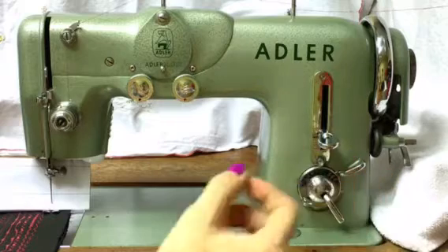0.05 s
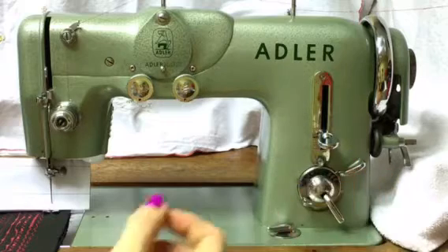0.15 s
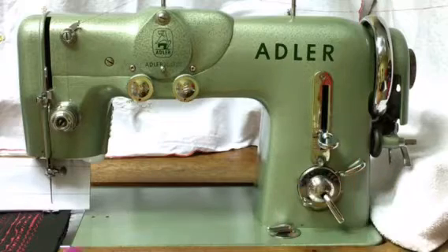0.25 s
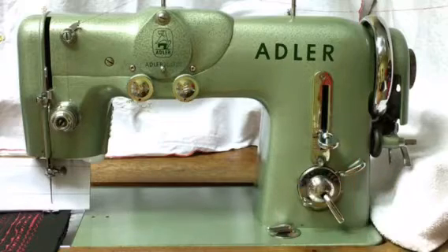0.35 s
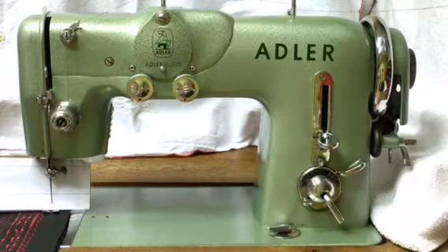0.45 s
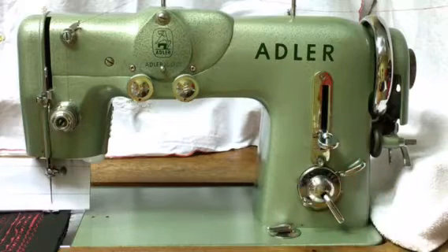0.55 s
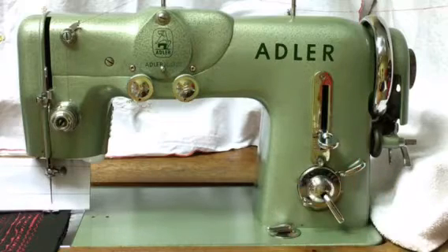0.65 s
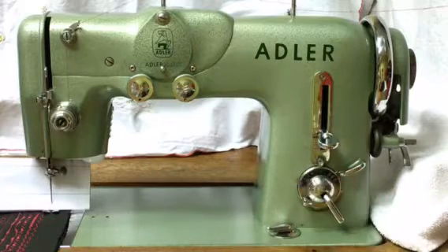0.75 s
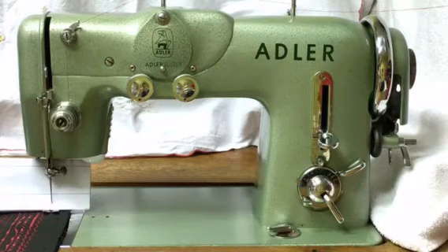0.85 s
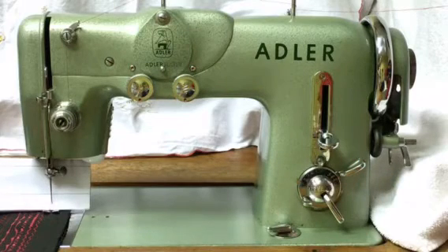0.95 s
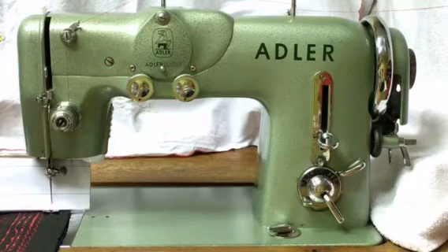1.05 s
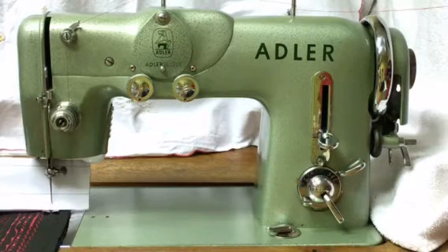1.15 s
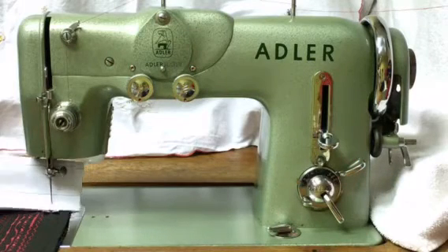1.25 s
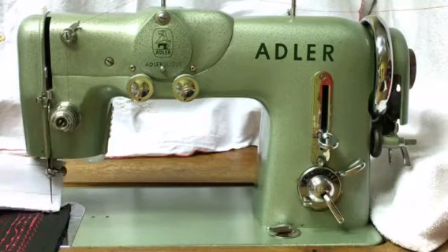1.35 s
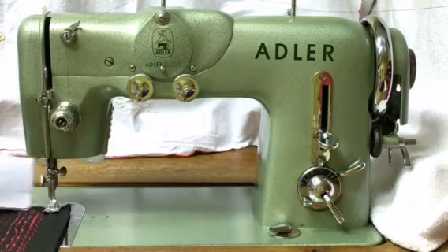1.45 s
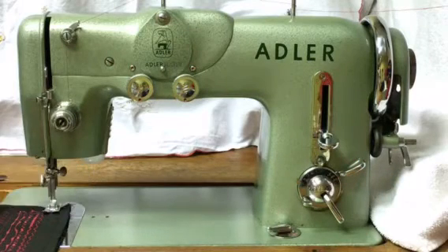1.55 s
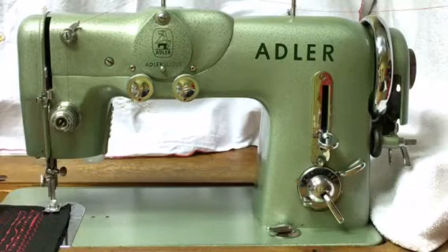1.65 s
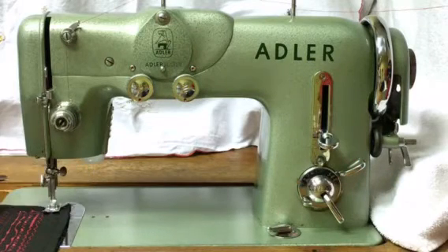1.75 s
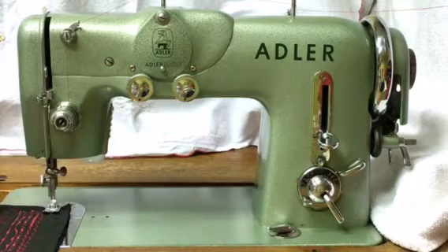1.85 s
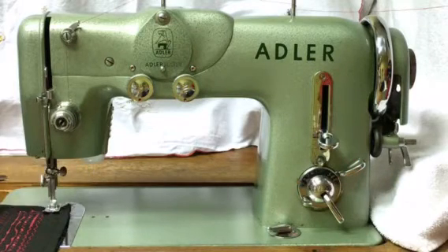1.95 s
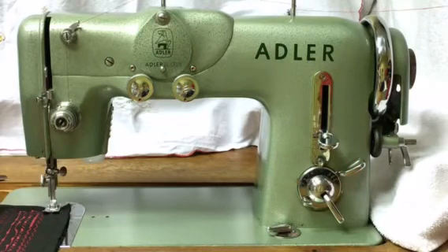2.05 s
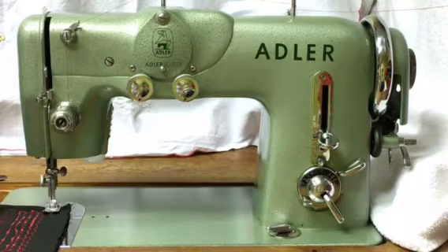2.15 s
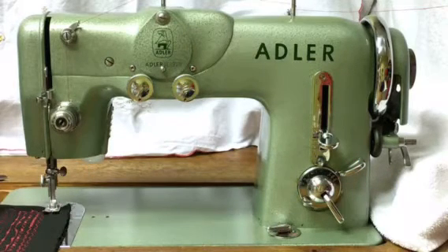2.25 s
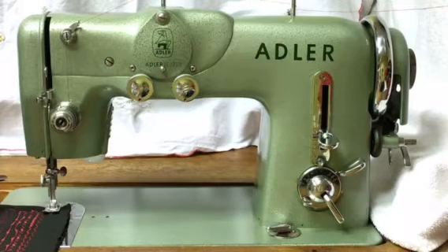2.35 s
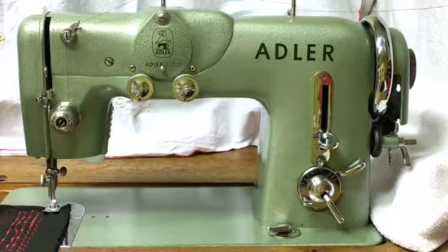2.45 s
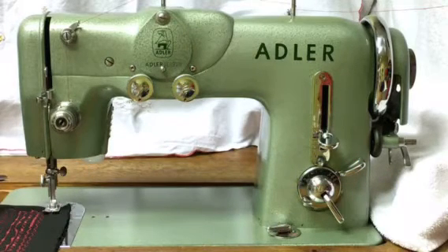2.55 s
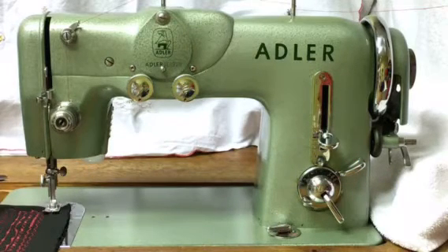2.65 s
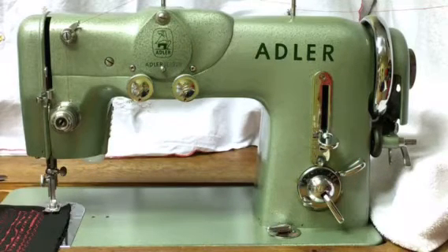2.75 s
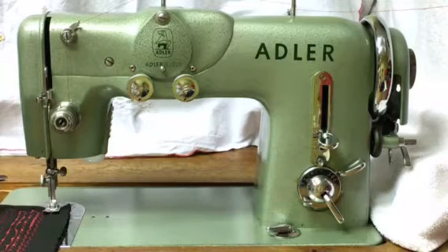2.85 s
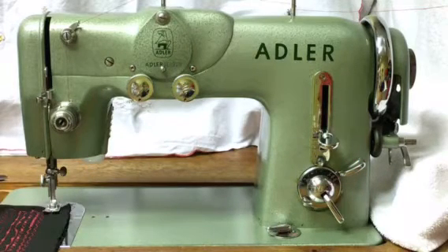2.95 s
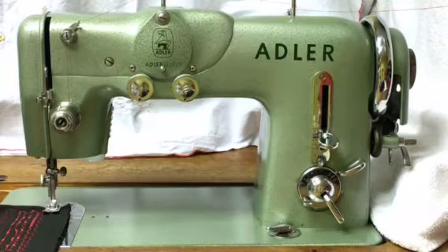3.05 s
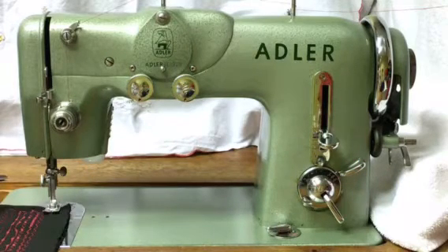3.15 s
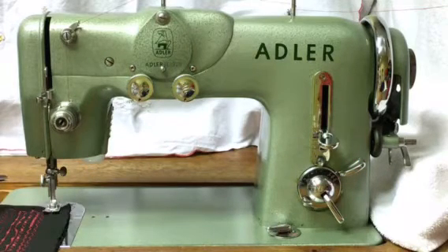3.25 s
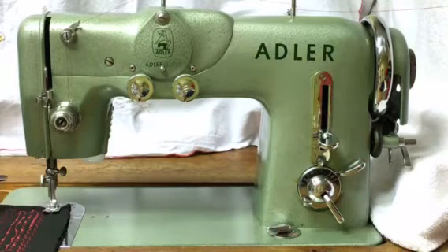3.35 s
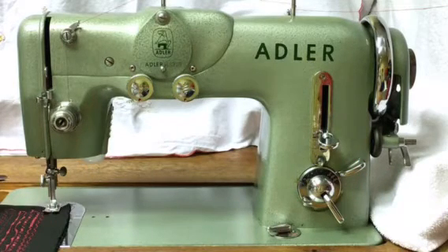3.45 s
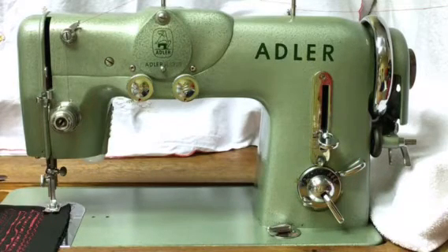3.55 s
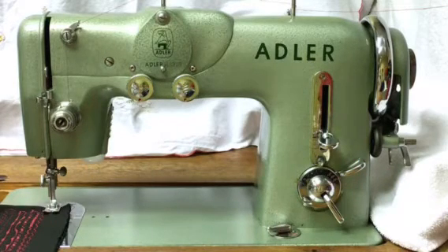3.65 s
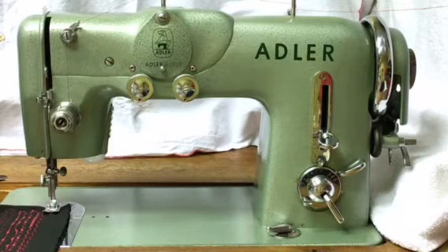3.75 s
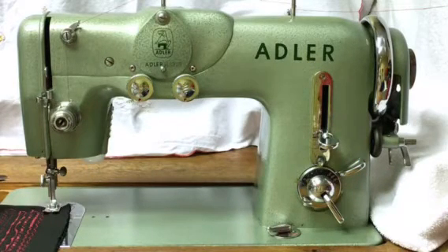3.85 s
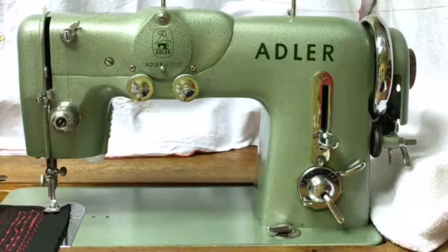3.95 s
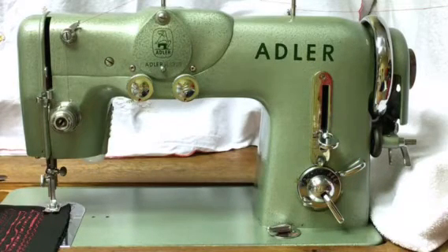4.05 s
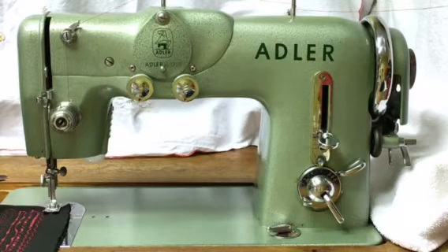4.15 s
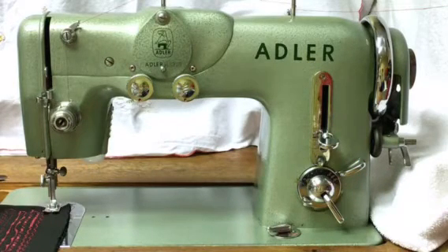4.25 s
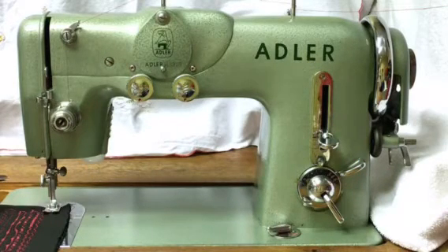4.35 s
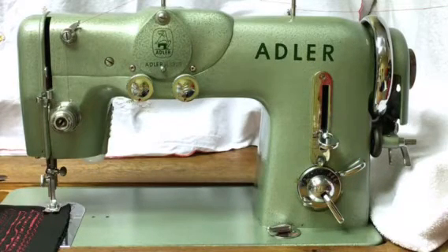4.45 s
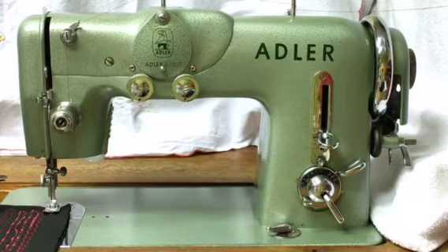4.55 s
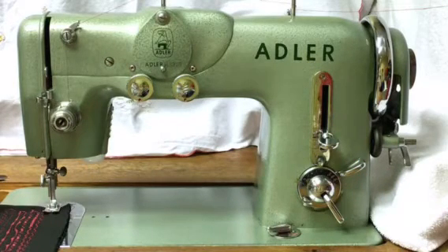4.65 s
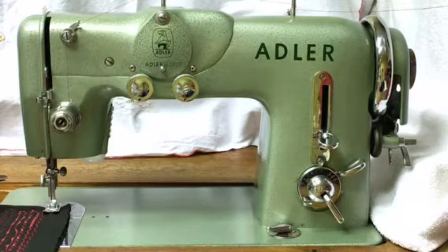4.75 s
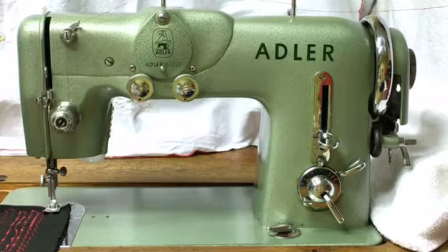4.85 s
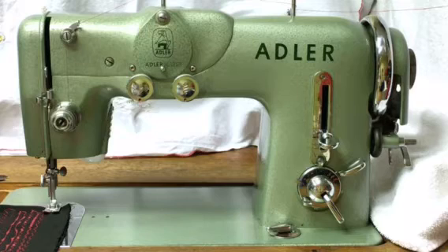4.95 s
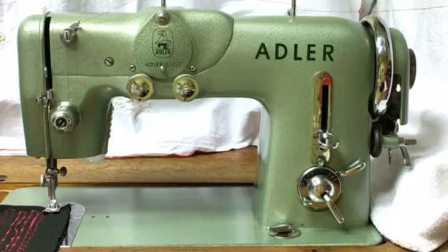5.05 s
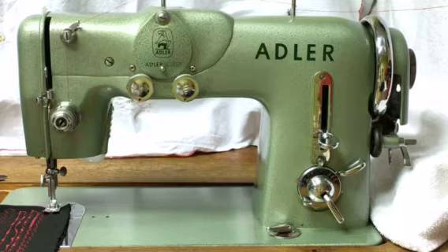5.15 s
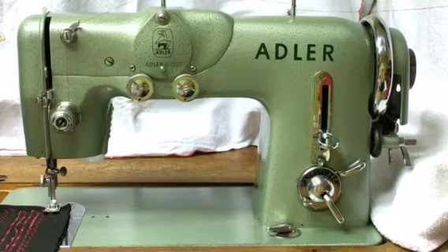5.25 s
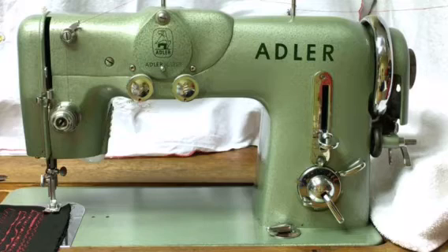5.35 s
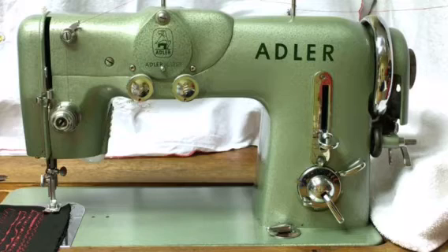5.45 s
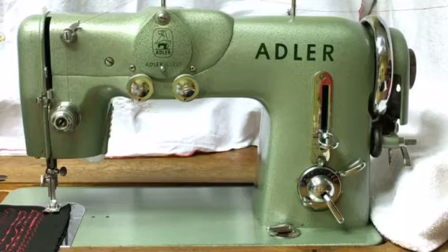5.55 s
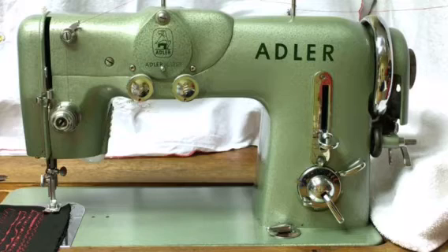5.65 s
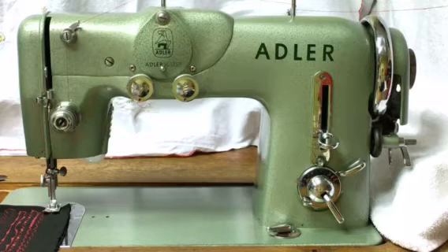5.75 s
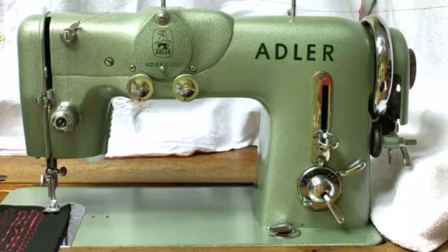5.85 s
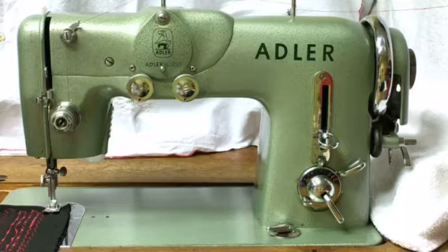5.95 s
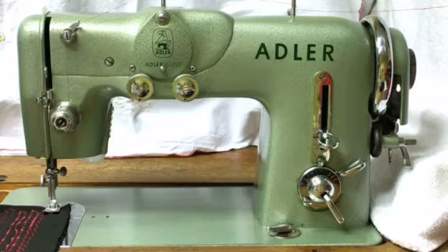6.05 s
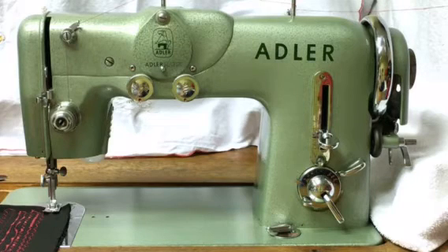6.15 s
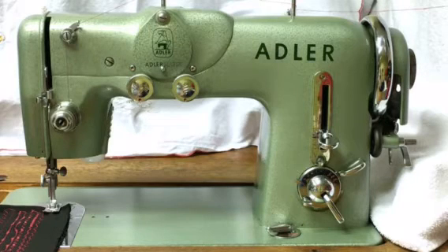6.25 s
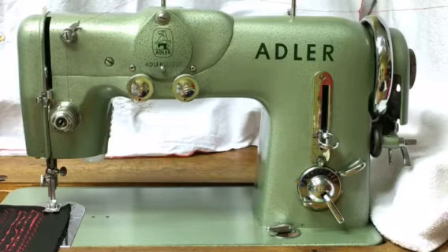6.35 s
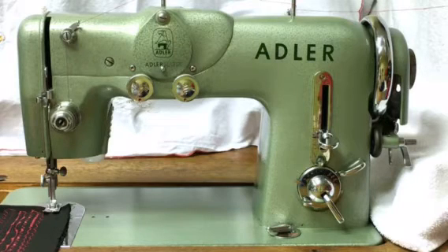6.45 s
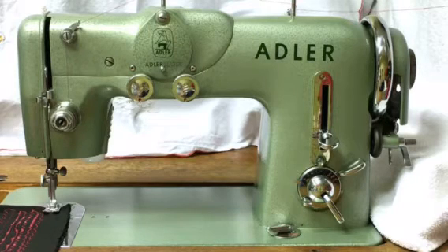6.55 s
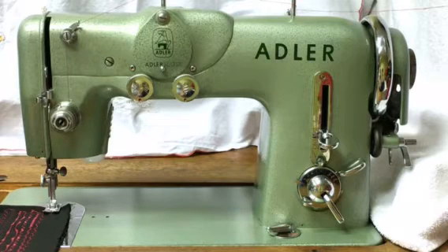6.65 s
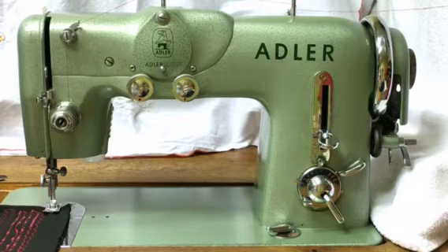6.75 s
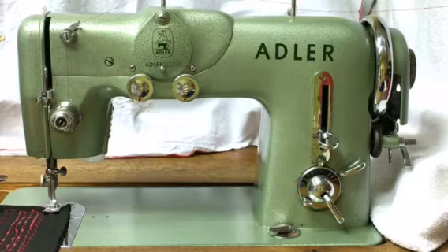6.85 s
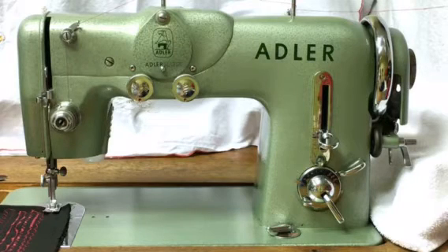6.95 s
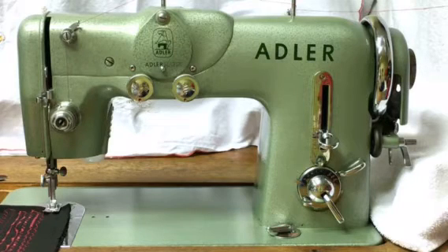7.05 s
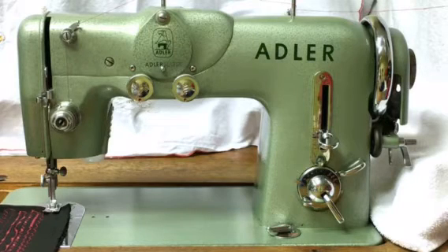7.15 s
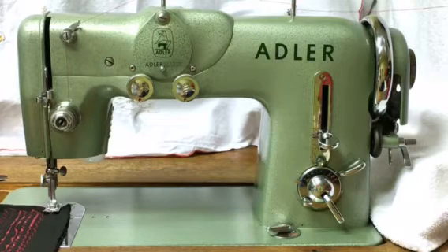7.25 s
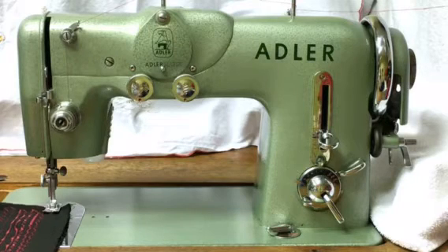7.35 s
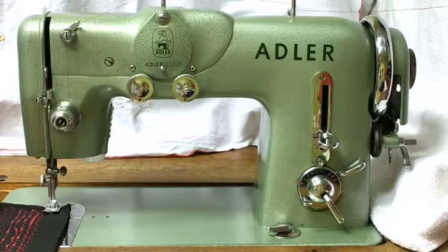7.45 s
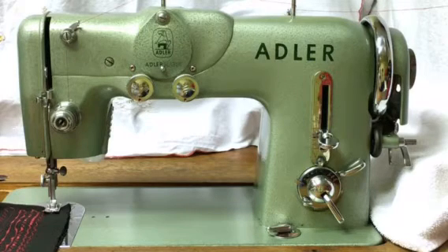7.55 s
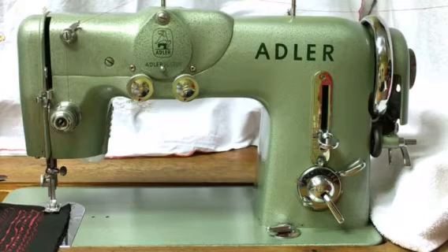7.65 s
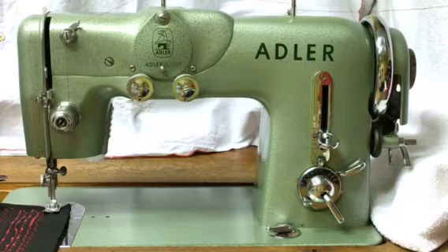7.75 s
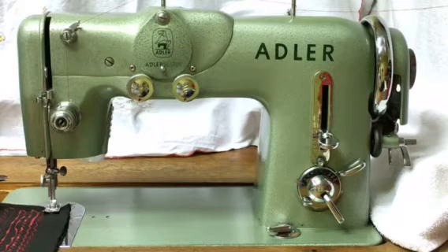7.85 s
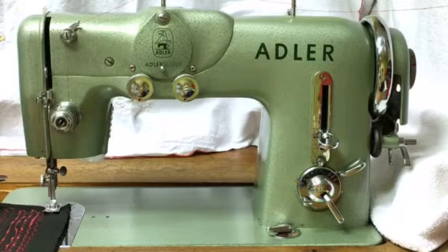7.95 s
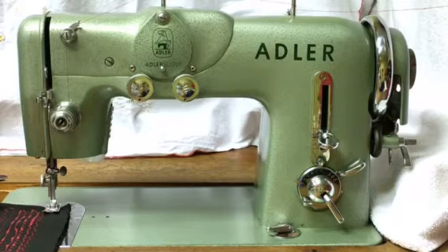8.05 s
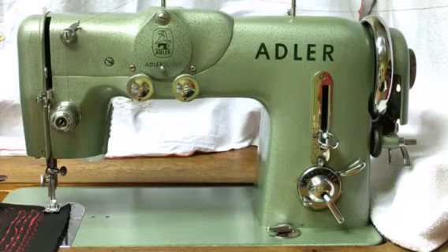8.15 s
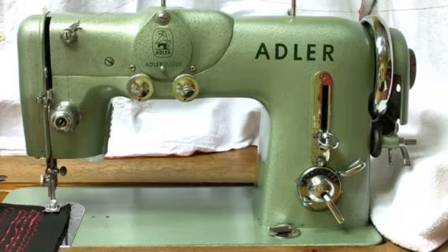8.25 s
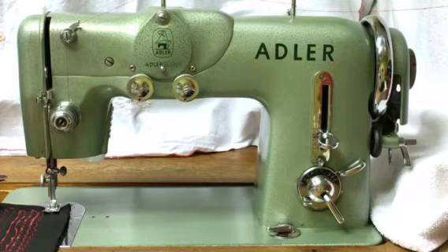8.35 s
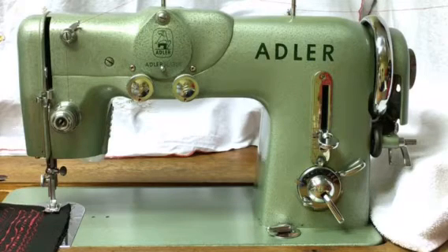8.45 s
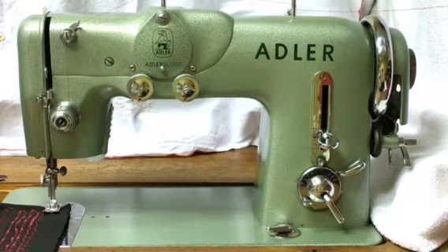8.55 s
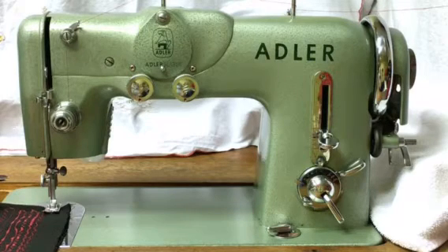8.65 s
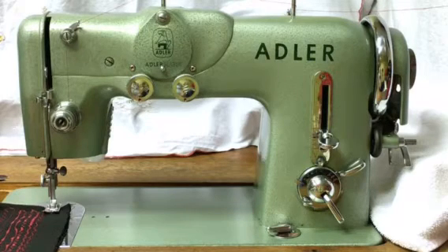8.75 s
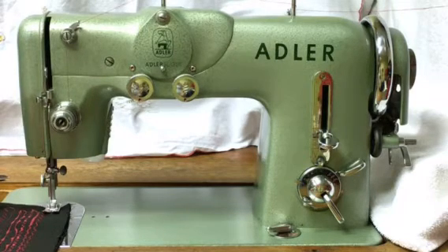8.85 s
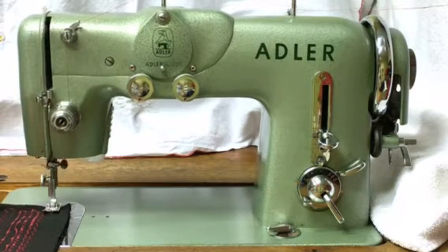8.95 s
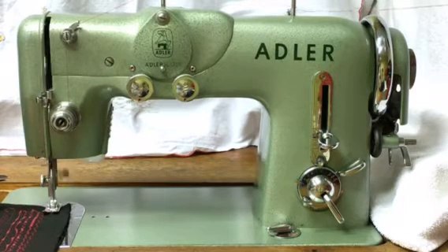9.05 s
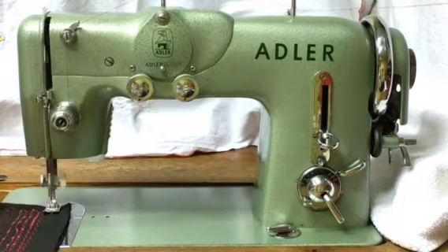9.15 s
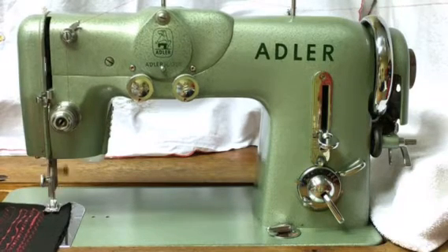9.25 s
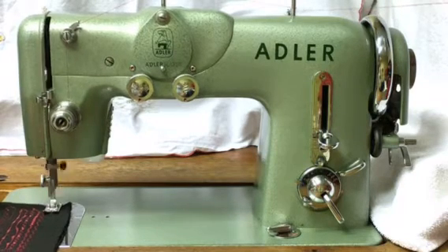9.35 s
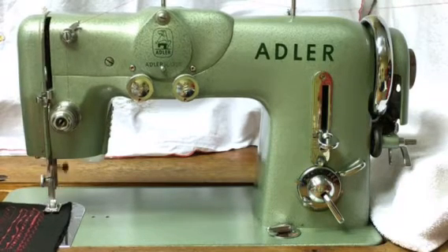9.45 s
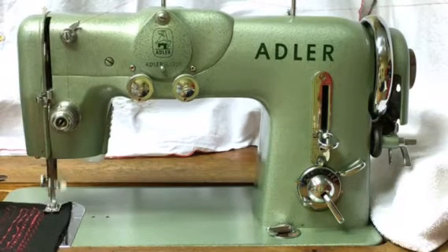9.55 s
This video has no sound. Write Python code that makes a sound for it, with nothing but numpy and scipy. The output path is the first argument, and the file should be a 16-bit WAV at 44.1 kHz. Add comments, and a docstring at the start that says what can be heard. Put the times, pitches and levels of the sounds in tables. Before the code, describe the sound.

A steady low motor hum dominates, with soft whirr and faint hiss beneath. One small paper snap comes first, then a brief crackling drag of paper, then quiet fabric rustles with light ticks. The hum continues almost alone for several seconds. Near the end faint belt ticks and gritty clutch rubbing lead to sharp clicks, then loud rapid needle clatter and table thuds. Close microphone, small indoor room.

```python
"""An induction motor idles under a sewing-machine table in a small room: hum, shaft sidebands and slot whine
are sums of cosines, its whirr is coloured noise. The clutch is eased in: the shaft slows, grit hisses,
the belt ticks. Then the machine stitches: grains of contact clatter and ring the table.
Sharp contacts are noise bursts through resonances. A hand slides a paper sheet away and rustles cloth:
both are dense grains shaped by stroke envelopes. A steady hiss lies beneath."""
import sys
import numpy as np
from scipy import signal
from scipy.fft import rfft, irfft
from scipy.io import wavfile
from scipy.ndimage import uniform_filter1d

SR = 44100
rng = np.random.default_rng(int(sys.argv[2]) if len(sys.argv) > 2 else 0)


def elevation(decibels):
    """Turn decibel levels (scalar or array-like) into linear amplitude ratios."""
    levels = np.asarray(decibels, float)
    return 10 ** (levels / 20)


def dump(signal):
    """Clip the signal to [-1, 1] and save it as 16-bit WAV at the path in sys.argv[1]."""
    limited = np.clip(np.atleast_2d(signal).T, -1, 1)
    pcm = np.round(limited * 32767).astype(np.int16)
    wavfile.write(sys.argv[1], SR, pcm)


N = 422478
T = np.arange(N) / SR


def curve(table):
    """Linear interpolation: the columns of a table over time."""
    s, *columns = np.transpose(table)
    return [np.interp(T, s, c) for c in columns]


def gate(table, fade=0.012):
    """Linear gating: one while a table lasts, fading to zero outside."""
    return np.clip(np.minimum(T - table[0][0], table[-1][0] - T) / fade + 1, 0, 1)


def unit(x):
    """Normalisation of mean power: scale to rms 1."""
    return x / np.sqrt(np.mean(x ** 2))


def colour(x, points):
    """Spectral shaping by (frequency [Hz], level [dB]), -80 dB beyond both ends; rms 1."""
    hz, db = np.transpose(points)
    f = np.arange(N // 2 + 1) * SR / N + 1
    gain_db = np.interp(np.log(f), np.log(hz), db, left=-80, right=-80)
    return unit(irfft(rfft(x) * elevation(gain_db), N))


def ring(x, hz, width):
    """Resonance: one second-order mode, gain 1 at its centre."""
    return signal.lfilter(*signal.iirpeak(hz, hz / width, fs=SR), x)


def walk(rate):
    """Random modulation: levels held 1 / rate seconds and slewed twice; spread near 1."""
    k = int(SR / rate)
    held = np.repeat(rng.standard_normal(N // k + 1), k)
    return 1.48 * uniform_filter1d(uniform_filter1d(held, k), k)[:N]


def grains(spread, smear_s, flicker_db, rate):
    """Granular friction: dense contacts of very unequal size, short noisy decays, flickering bunches."""
    power = 10 ** (spread * np.minimum(rng.exponential(size=N), 7.5) / 10)
    decay = np.exp(-1 / (smear_s * SR))
    envelope = np.sqrt(signal.lfilter([1 - decay], [1, -decay], power))
    return envelope * rng.standard_normal(N) * elevation(flicker_db * walk(rate))


def strokes(rows, bend=1.):
    """Power addition of strokes, each climbing and dropping 20 dB in its rise and fall; bend rounds the top."""
    power = np.full(N, 1e-18)
    for s, db, rise, fall in rows:
        part = slice(max(int((s - 4 * rise) * SR), 0), int((s + 4 * fall) * SR))
        distance = np.maximum((s - T[part]) / rise, (T[part] - s) / fall)
        power[part] += elevation(2 * db - 2 * 20 * distance ** bend)
    return np.sqrt(power)


def loaded(rule, load):
    """Load dependence: a level [dB] that shifts with load and wavers."""
    idle_db, change_db, calm_db, rough_db = rule
    waver_db = calm_db + (rough_db - calm_db) * np.minimum(load, 1)
    return idle_db + change_db * load + waver_db * walk(4.5)


# the motor's loose fit on the table shifts:
# (time [s], hum rms [dB], casing buzz before load [dB], first slot whine gain before load [dB])
MOTOR = [(0.0, -51, -66, -0.5), (0.8, -49, -64, -2), (2.3, -48.6, -62.5, -1.5), (2.8, -48.5, -60, 3.5),
         (3.4, -48.5, -61, 4.5), (4.2, -49.5, -65, 2), (5.1, -47.5, -60, -1), (5.7, -48, -60, -3.5),
         (6.1, -45, -63.5, -10), (6.35, -46.5, -55.5, -4), (6.6, -45, -69, -8), (7.2, -47, -61.5, 5),
         (7.55, -47.5, -63, -11), (7.9, -46.5, -63, -2), (8.4, -48.5, -59.5, -2), (8.72, -47.5, -63, 0),
         (9.0, -50, -65, -7), (9.58, -44, -67, -5)]
# the clutch drags the shaft down in surges: (time [s], turns [Hz])
SHAFT = [(0.0, 24.83), (6.65, 24.83), (6.75, 24.6), (7.05, 24.4), (7.25, 23.86), (7.44, 24.14),
         (7.6, 23.94), (7.75, 24.09), (7.85, 23.85), (7.95, 23.75), (8.05, 24.0), (8.16, 24.14),
         (8.26, 24.03), (8.45, 23.45), (8.55, 23.75), (8.65, 24.26), (8.75, 24.1), (8.85, 24.11),
         (8.95, 23.8), (9.58, 23.8)]


def motor():
    """Electromagnetic and mechanical excitation: hum and shaft phases drive every part; torque slows the shaft."""
    hum_hz, idle_hz = 99.98, 24.83  # the hum is at twice the mains
    hum_db, casing_db, slot_db = curve(MOTOR)
    shaft_hz = curve(SHAFT)[0]
    hum = 2 * np.pi * hum_hz * T
    shaft = 2 * np.pi * np.cumsum(shaft_hz) / SR
    sag = (idle_hz - shaft_hz) / 0.76
    load = np.clip(sag, 0, 1)
    wander = [walk(2.473) for _ in range(6)]
    tones = magnetic_hum(hum, shaft, hum_db, sag, load) + sidebands(hum, shaft, load, wander)
    tones += slot_whine(hum, shaft, hum_db, slot_db, load, wander)
    return np.sqrt(2) * tones + whirr(hum, shaft, casing_db, load)  # sqrt(2) turns rms into peak


# line levels under load: (idling level [dB], change at full load [dB],
# wavering idling [dB], wavering under load [dB])
SECOND_HUM = (-47, -5, 0.1, 3.3)
HUM_SIDE = (-60, 4.5, -0.5, 4)
SECOND_SIDE = (-61.5, -5.5, 1.6, 3)
TWICE_A_TURN = (-71.5, 3, 5, -1.5)
# the line above the second hum harmonic swells briefly: (time [s], peak [dB], rise [s], fall [s])
SIDE_SWELL = [(7.93, -52, 0.15, 0.3)]


def magnetic_hum(hum, shaft, hum_db, sag, load):
    """Magnetic pull: hum, its second harmonic, a shaft sideband of each, and a line at twice the shaft rate."""
    second_side = elevation(loaded(SECOND_SIDE, load)) + strokes(SIDE_SWELL)
    out = elevation(hum_db) * np.cos(hum) + elevation(loaded(SECOND_HUM, sag)) * np.sin(2 * hum)
    out += elevation(loaded(HUM_SIDE, load)) * np.cos(hum + shaft) + second_side * np.cos(2 * hum + shaft)
    return out + elevation(loaded(TWICE_A_TURN, load)) * np.cos(2 * shaft)


# each line lies at m x hum + k x shaft: (m [hum multiples], k [shaft multiples])
SIDEBANDS = [(1, 2), (2, -1), (2, 2), (3, 0), (3, 1), (4, 0), (5, 0), (5, 2), (6, 3), (7, 1), (7, 3),
             (8, 2), (9, 0), (13, 1), (14, 0)]
# one idling level a line: (level [dB])
SIDEBAND_DB = [-67.5, -59.5, -66.5, -63, -66, -70.5, -78.5, -74, -72, -69.5, -92, -72, -73.5, -76, -72]


def sidebands(hum, shaft, load, wander):
    """Modulation by rotation: lines spaced by the shaft rate; the dragging clutch makes them unsteady."""
    out = np.zeros(N)
    for i, ((m, k), db) in enumerate(zip(SIDEBANDS, SIDEBAND_DB)):
        level_db = db - 6.0 * load + (2.33 + 2.6 * load) * wander[i % 6]
        out += elevation(level_db) * np.cos(m * hum + k * shaft + rng.uniform(0, 2 * np.pi))
    return out


# 31 rotor slots, lines at m x hum + k x shaft: (m [hum multiples], k [shaft multiples])
SLOT_LINES = [(0, 29), (-1, 31), (0, 31), (1, 31), (2, 31), (5, 31), (6, 31), (7, 31), (-1, 62), (0, 62),
              (1, 62), (2, 62), (-1, 93), (0, 124)]
# one level a line, before gain: (level [dB])
SLOT_DB = [-74, -80, -92, -71.5, -79, -66.5, -71, -88, -79, -71, -69.5, -71, -83, -82.5]
# third slot harmonic: (idling level [dB], change at full load [dB],
# wavering idling [dB], wavering under load [dB])
THIRD_SLOT = (-70.5, -7, 1.8, 0.5)


def slot_whine(hum, shaft, hum_db, slot_db, load, wander):
    """Slot-passing tones: multiples of 31 per turn, shifted by the hum; the first group sags with load."""
    jitter = 2 * np.pi * np.cumsum(.05 * load * walk(30)) / SR  # the slipping clutch shakes the speed
    slots = shaft + jitter
    out = np.zeros(N)
    for i, ((m, k), db) in enumerate(zip(SLOT_LINES, SLOT_DB)):
        if k < 40:
            gain_db = slot_db - 17 * load ** 2
        else:
            gain_db = -2.5 + load * (3 if m == 2 else -4)  # load favours the upper line
        level_db = db + gain_db + 2.2 * wander[i % 6]
        out += elevation(level_db) * np.cos(m * hum + k * slots + rng.uniform(0, 2 * np.pi))
    # the third harmonic swells with the hum
    third_db = loaded(THIRD_SLOT, load ** 2) + 1.3 * (hum_db - np.mean(hum_db))
    return out + elevation(third_db + 1.5 * walk(15)) * np.cos(93 * slots)


# bearing and fan whirr with the room air: (frequency [Hz], relative density [dB per Hz])
WHIRR_COLOUR = [(30, -24), (60, -13), (150, -4), (300, -2.5), (480, -6.5), (700, -3), (1050, -15),
                (1400, -30), (1700, -14), (2050, -20.5), (2350, -15), (2800, -30), (4200, -23.5),
                (5000, -43)]
# sheet-metal resonances the whirr excites: (frequency [Hz], width [Hz], drive [dB])
CASING = [(860, 59, -3), (1297, 430, 3), (1435, 116, 1), (1670, 280, -12), (1855, 100, -8)]
# rumble: (idling level [dB], change at full load [dB], wavering idling [dB], wavering under load [dB])
RUMBLE = (-64.5, 10, 1, 0)


def whirr(hum, shaft, casing_db, load):
    """Amplitude-modulated noise: whirr throbs with hum and shaft, excites the casing; a rumble grows with load."""
    throb = (1 + 0.27 * np.cos(hum)) * (1 + 0.24 * np.cos(shaft))
    air = colour(rng.standard_normal(N) * throb * elevation(0.51 * walk(6)), WHIRR_COLOUR)
    rumble = colour(rng.standard_normal(N) * elevation(1 * walk(5.7)),
                    [(40, -12), (110, 1), (230, -0.5), (330, -6.0), (450, -40)])
    drive = rng.standard_normal(N) * throb * elevation(1.3 * walk(15))
    casing = unit(sum(elevation(db) * ring(ring(drive, hz, width), hz, width) for hz, width, db in CASING))
    out = elevation(casing_db - 6.5 * load) * casing + elevation(-59.5 + 0.92 * walk(3.02)) * air
    return out + elevation(loaded(RUMBLE, load)) * rumble


# needle bar, hook and feed in motion: (time [s], clatter [dB], bright part re clatter [dB])
STITCH = [(8.85, -79, 6), (8.93, -66, 7), (8.95, -55.5, -2), (9.0, -58, 2.5), (9.046, -43, -16),
          (9.08, -51.5, -7), (9.12, -42.5, 0), (9.18, -41, -0.5), (9.225, -36, -3), (9.25, -38, -2.5),
          (9.34, -37.5, 1), (9.355, -39, -2.5), (9.42, -44, -1.5), (9.43, -35.5, 0), (9.46, -45, -2.5),
          (9.52, -35.5, -3), (9.555, -42, -1), (9.58, -43, -3)]
# spectra of the bright and the heavy part: (frequency [Hz], relative level [dB])
BRIGHT_COLOUR = [(1760, -31), (3000, -4), (3720, -3), (4950, -6.5), (6540, -4.5), (7510, -7), (9450, -1),
                 (10300, -9), (11600, -2), (15800, -11.5)]
HEAVY_COLOUR = [(180, -4), (300, -6.5), (353, -18), (404, -4.5), (490, -7), (786, 3), (900, -5.5),
                (1050, -1), (2250, -1), (3000, -16), (3900, -41), (6600, -120)]
# the cast frame answers the clatter: (frequency [Hz], width [Hz], level re clatter [dB])
FRAME_MODES = [(1040, 150, -19), (2090, 390, -13), (3400, 320, -19), (6560, 460, -19.5)]
# heavy strokes shake the table: (time [s], peak of the envelope [dB], rise [s], fall [s])
THUMPS = [(8.96, -63, 0.2, 0.26), (9.12, -51, 0.06, 0.061), (9.228, -24.5, 0.027, 0.092),
          (9.29, -30.5, 0.091, 0.11), (9.355, -37, 0.017, 0.056), (9.415, -31.5, 0.016, 0.079),
          (9.47, -34, 0.05, 0.05), (9.525, -28, 0.1, 0.078)]
# table modes; the first gives only its frequency: (frequency [Hz], width [Hz], level re envelope [dB])
TABLE = [(133, 18, 0), (260, 67, -16.5), (398, 41, -27.5)]


def stitch():
    """Impact excitation of modes: loose parts clatter in the frame; a swaying tone and rung jolts are the table."""
    clatter_db, bright_db = curve(STITCH)
    jolts = grains(4.2, 0.0016, 0.8, 90)
    bright, heavy = colour(jolts, BRIGHT_COLOUR), colour(jolts, HEAVY_COLOUR)
    clatter = elevation(clatter_db) * (elevation(bright_db) * bright + heavy)
    for hz, width, db in FRAME_MODES:
        clatter += elevation(clatter_db + db + 4.0 * walk(35)) * unit(ring(jolts, hz, width))
    sway = np.sqrt(2) * np.cos(2 * np.pi * TABLE[0][0] * T + 1.6 * walk(12))
    upper = sum(elevation(db) * unit(ring(jolts, hz, width)) for hz, width, db in TABLE[1:])
    return gate(STITCH, .05) * clatter + strokes(THUMPS, bend=1.2) * (sway + upper)


# clutch lining brushing the disc: (time [s], level [dB])
RUB = [(6.6, -82), (6.75, -76), (7.08, -81), (7.12, -65.5), (7.37, -63.5), (7.78, -69.5), (7.82, -65.5),
       (7.97, -70), (8.16, -75), (8.33, -63), (8.37, -63.5), (8.39, -57.5), (8.58, -57.5), (8.71, -67),
       (8.76, -66), (8.87, -58.5), (8.9, -63)]
# broad bands in the hiss: (frequency [Hz], width [Hz], relative level [dB])
RUB_BANDS = [(3300, 590, -3.5), (6100, 1700, -1), (8900, 2100, -4), (12400, 3000, -14)]
# spectrum of fine friction, clutch grit and cloth alike: (frequency [Hz], relative level [dB])
FRICTION_COLOUR = [(1180, -22), (2000, -5), (2240, 1), (2660, -4.5), (3190, -3.5), (4830, -10.5),
                   (6050, -5.5), (7510, -9.5), (9240, -5), (10300, -11.5), (12400, -6.5), (15100, -9),
                   (15800, -18)]


def rub():
    """Sliding friction: the slipping clutch hisses, its grit reinforced in a few broad bands."""
    grit = colour(grains(2.0, .001, 2.3, 30), FRICTION_COLOUR)
    bands = unit(sum(elevation(db) * unit(ring(grit, hz, width)) for hz, width, db in RUB_BANDS))
    return elevation(curve(RUB)[0]) * gate(RUB) * unit(bands + elevation(10) * grit)


# the clutch bites: (time [s], half length [s], level [dB])
SCUFF = (9.038, 0.014, -42)
# clutch housing: (frequency [Hz], width [Hz], relative level [dB])
SCUFF_MODES = [(1055, 110, 0), (1340, 120, -6), (2330, 200, -5), (2550, 200, -5), (3470, 200, -11)]


def scuff():
    """Resonance under friction: a short rub swells and fades in the clutch housing's modes."""
    s, half_s, level_db = SCUFF
    noise = rng.standard_normal(N)
    rung = unit(sum(elevation(db) * unit(ring(noise, hz, width)) for hz, width, db in SCUFF_MODES))
    return elevation(level_db) * np.exp(-((T - s) / half_s) ** 2) * rung


# needle bar and hook strike: (time [s], level [dB], ringing [Hz])
KNOCKS = [(8.961, -42, 3310), (9.0704, -41, 6350), (9.0766, -31.5, 3300), (9.2232, -27.5, 2630),
          (9.2475, -26, 6600), (9.2614, -37, 2610), (9.275, -31, 3340), (9.3092, -36, 3440),
          (9.326, -28, 3190), (9.339, -26, 9100), (9.428, -32.5, 6640), (9.4983, -32, 3440),
          (9.5143, -23, 3370), (9.5398, -32, 3730)]
# the clutch catches and lets go: (time [s], level [dB], lower body re level [dB], ringing [Hz])
CATCHES = [(6.687, -57, 2, 8900), (6.699, -64, 17.5, 2840), (7.0696, -66, 17, 2600),
           (7.226, -53.5, 9, 3400), (7.525, -73, 14, 3700), (7.8069, -37, 0, 5660), (7.887, -42, -1, 5700),
           (7.983, -47, 1, 6100), (8.0287, -57, -2, 3230), (8.072, -60, 4, 3070), (8.117, -54, -2, 3400),
           (8.157, -55, -2, 3390), (8.201, -50, 3, 3630), (8.2424, -51.5, 6, 3570), (8.282, -50.5, 6, 3500)]
# runs of faint, evenly spaced belt ticks, near the shaft rate:
# (start [s], period [s], first level before scatter [dB], last level before scatter [dB], count [ticks])
BELT = [(6.7225, 0.0406, -66, -63, 9), (7.4294, 0.0396, -63, -52, 8)]
# paper creases snap: (time [s], level [dB], ringing [Hz])
SNAPS = [(0.5581, -35, 3520), (0.564, -35, 3520), (0.5704, -35, 3370), (1.1902, -57, 3110),
         (1.2044, -53, 3080), (1.216, -47, 5980), (1.227, -46, 5900), (1.251, -49, 3460),
         (1.2745, -41, 5550), (1.299, -27.5, 4550), (1.311, -29.5, 3440), (1.3279, -30, 5880),
         (1.3343, -27.5, 5870), (1.3544, -33, 6100), (1.3714, -27.5, 6200), (1.4196, -37, 2790),
         (1.49, -37.5, 3520), (1.5094, -52, 3180), (1.553, -40.5, 3050)]
# fingers and cloth tap the machine: (time [s], level [dB], lower body re level [dB], ringing [Hz])
TICKS = [(0.0506, -71, 1, 2660), (0.1101, -61.5, 0, 4100), (0.1356, -62, 2, 3070), (1.656, -40.5, -5, 2400),
         (1.943, -59, 12, 9300), (2.113, -61, -1, 4110), (2.1894, -58, -1, 3900), (2.4299, -52.5, -3, 4060),
         (2.504, -57.5, 15, 3120), (2.5426, -51, 4, 5580), (2.6585, -51, 4, 2630), (2.689, -41, 2.5, 2960),
         (2.871, -52, 16, 3160), (3.269, -69, 3, 4110), (5.6276, -58, 0, 2960)]


def tick_rows():
    """Superposition of impacts: (time [s], level [dB], lower body [dB], top [dB], ringing [Hz]) of each."""
    rows = [(s, db, -11, -9, hz) for s, db, hz in KNOCKS]
    rows += [(s, db, body_db, 4, hz) for s, db, body_db, hz in CATCHES]
    for start, period, first_db, last_db, count in BELT:
        level = np.linspace(first_db, last_db, count) + 3.5 * rng.standard_normal(count)
        rows += [(start + k * period, db, 1, 2, 8350) for k, db in enumerate(level)]
    rows += [(s, db, -8, -23, hz) for s, db, hz in SNAPS]
    rows += [(s, db, body_db, -14, hz) for s, db, body_db, hz in TICKS]
    return rows


# broad resonances shared by all ticks, three low, three middle, two top:
# (frequency [Hz], width [Hz], relative level [dB])
TICK_MODES = [(940, 360, -7), (1420, 400, 2), (1900, 310, 1), (3400, 2100, 6.5), (4350, 1400, -7),
              (5900, 1700, 3.5), (8800, 2600, 1), (11300, 1100, 2.5)]


def ticks():
    """Impulse response: a burst with a fading tail excites shared broad modes and one narrow ring of its own."""
    size, t60_s = 4096, 0.057  # samples a tick; tail's 60 dB decay
    out = np.zeros(N + size)
    t = np.arange(size) / SR
    tail = 0.59 * np.exp(-np.log(1000) * t / t60_s)
    for s, level_db, body_db, top_db, ring_hz in tick_rows():
        crack = np.clip((level_db + 58) / 14, 0, 1.4)  # light ticks are soft puffs, hard ones crack
        burst = rng.standard_normal(size) * (crack * np.exp(-t / 0.0015) + tail)
        chance = rng.standard_normal(len(TICK_MODES))
        rung = [elevation(db + 1.1 * c) * ring(burst, hz, width) for (hz, width, db), c in zip(TICK_MODES, chance)]
        body, middle, top = sum(rung[:3]), sum(rung[3:6]), sum(rung[6:])
        parts = ((body, body_db), (middle, 0), (top, top_db), (ring(burst, ring_hz, 290), -4))
        i = int(s * SR)
        # each part is scaled by its own peak
        out[i:i + size] += sum(elevation(level_db + db) * part / np.abs(part).max() for part, db in parts)
    return out[:N]


# paper dragged over the bed in tugs: (time [s], peak of the envelope [dB], rise [s], fall [s])
PAPER = [(0.564, -45, 0.0062, 0.058), (1.2, -59, 0.012, 0.08), (1.226, -55, 0.02, 0.081),
         (1.277, -39, 0.011, 0.12), (1.33, -35, 0.012, 0.093), (1.375, -40, 0.02, 0.077),
         (1.44, -42.5, 0.16, 0.11), (1.5, -52, 0.02, 0.03), (1.555, -51, 0.02, 0.015)]
# spectrum of the slips: (frequency [Hz], relative level [dB])
PAPER_COLOUR = [(210, -35), (350, -4), (695, -3), (955, -14), (1160, -6), (1640, -5.5), (2150, 4),
                (2920, -3.5), (3420, 0.5), (5010, -3.5), (6070, -3.5), (10400, -11), (12200, -10.5),
                (15800, -20)]
# the stiff sheet rings briefly: (frequency [Hz], width, raised to 160 at least [Hz], relative level [dB])
PAPER_MODES = [(2140, 85, 0), (3370, 160, -3), (4370, 230, 6), (5500, 37, 5), (5880, 110, 8),
               (7600, 76, -10), (8100, 100, 4), (12100, 120, -16)]


def paper():
    """Stick and slip of a sheet: coarser grain rings the sheet's modes, each coming and going as it bends."""
    slips = grains(4.1, 0.00041, 0.85, 120)
    rung = unit(sum(elevation(db + 3 * walk(30)) * unit(ring(slips, hz, max(width, 160)))
                    for hz, width, db in PAPER_MODES))
    drag = strokes(PAPER, bend=1.34)
    # it rings most when pulled hardest
    ring_db = 1.3 * (20 * np.log10(drag + 1e-9) + 36.4) - 3
    return drag * (colour(slips, PAPER_COLOUR) + elevation(ring_db) * rung)


# cloth and fingers, one row a stroke:
# (time [s], peak of the envelope [dB], rise [s], fall [s], airy over dull [dB])
RUSTLE = [(0.052, -69.5, 0.01, 0.077, 6), (0.32, -74, 0.1, 0.03, -8), (0.4, -65, 0.05, 0.068, 0.1),
          (0.54, -76, 0.3, 0.36, 9), (1.7, -66, 0.066, 0.1, -1), (1.775, -60.5, 0.062, 0.062, 5),
          (1.84, -61, 0.05, 0.049, 5), (1.946, -64.5, 0.04, 0.084, 4), (1.985, -69, 0.02, 0.018, -8),
          (2.06, -73.5, 0.048, 0.3, -5), (2.29, -59, 0.11, 0.09, 1), (2.39, -63.5, 0.044, 0.04, -2),
          (2.45, -56, 0.066, 0.073, 1.5), (2.558, -54.5, 0.056, 0.13, 1), (2.69, -50, 0.012, 0.051, -3),
          (2.76, -60, 0.15, 0.15, 2), (2.825, -54.5, 0.05, 0.047, -1), (2.915, -58, 0.17, 0.058, 1),
          (3.01, -66, 0.11, 0.12, 0), (3.3, -70.5, 0.43, 0.13, -2), (3.66, -73.5, 0.3, 0.13, -1),
          (4.02, -71, 0.12, 0.099, 1), (4.17, -69.5, 0.041, 0.18, 7), (4.25, -68, 0.1, 0.11, 6),
          (4.365, -63, 0.082, 0.069, 4), (4.47, -67, 0.15, 0.09, 5), (4.7, -76, 0.5, 0.12, -3),
          (5.09, -65.5, 0.15, 0.082, -6), (5.42, -69, 0.39, 0.08, -3), (5.635, -66, 0.012, 0.051, -1),
          (6.17, -77, 0.73, 0.07, -3), (6.34, -73, 0.11, 0.1, -2), (6.47, -70.5, 0.15, 0.06, -3)]
# bands that come and go with the grip: (frequency [Hz], width [Hz], relative level [dB])
CLOTH_BANDS = [(4030, 1100, -4), (6100, 1500, 1), (9100, 1500, -3.5), (12200, 3300, -6)]


def rustle():
    """Fibre friction: fine grain in drifting broad bands, split into dull and airy parts balanced by stroke."""
    shift_db, split_hz = 0.5, 6900  # drift of each band; above the split the rustle is airy
    fibres = colour(grains(1.9, .001, 1.1, 40), FRICTION_COLOUR)
    bands = sum(elevation(db + shift_db * walk(14)) * unit(ring(fibres, hz, width)) for hz, width, db in CLOTH_BANDS)
    cloth = unit(fibres + elevation(-7) * bands)
    dull_points = [(1000, 0), (split_hz / 1.3, 0), (split_hz * 1.3, -30), (16000, -50)]
    airy_points = [(1000, -50), (split_hz / 1.3, -14), (split_hz, 0), (16000, 0)]
    dull = colour(cloth, dull_points) / np.sqrt(2)
    airy = colour(cloth, airy_points) / np.sqrt(2)
    low, high = (strokes([(s, db + sign * air_db / 2, rise, fall) for s, db, rise, fall, air_db in RUSTLE],
                         bend=1.28) for sign in (-1, 1))
    return low * dull + high * airy


# spectrum of the steady hiss: (frequency [Hz], relative level [dB])
HISS_COLOUR = [(1470, -20), (2500, -16), (2870, -5), (3130, -1), (3820, -1.5), (4890, -10), (5490, -6.5),
               (7710, -9.5), (9350, -8.5), (14000, -11), (15800, -13)]


def hiss():
    """Stationary noise: Gaussian noise shaped by a fixed spectrum, at a steady level."""
    return elevation(-73.5) * colour(rng.standard_normal(N), HISS_COLOUR)


def room(x, t60=0.33, wet_db=-14):
    """Reverberation: convolution with a short, exponentially decaying diffuse tail from the walls."""
    t = np.arange(int(.4 * SR)) / SR
    tail = rng.standard_normal(len(t)) * np.exp(-np.log(1000) * t / t60) * (t > .004)
    return x + elevation(wet_db) * signal.fftconvolve(x, tail / np.sqrt(np.sum(tail ** 2)))[:N]


def scene():
    """Superposition: the sources add; paper, sharp contacts and scuff also reverberate."""
    reverberant = room(paper() + ticks() + scuff())
    return (motor() + stitch() + rub() + reverberant + rustle() + hiss())[None]


def top_cut(x):
    """Nothing passes above the cut-off."""
    return signal.sosfilt(signal.butter(12, 16630, fs=SR, output="sos"), x)


def record(dry):
    """Low-pass filtering: the recorder cuts the top with a steep elliptic filter at 16400 Hz."""
    lowpass = signal.ellip(8, .2, 60, 16400, fs=SR, output="sos")
    finished = signal.sosfilt(lowpass, dry)
    return top_cut(finished)


dry = scene()
out = record(dry)
dump(out)
```